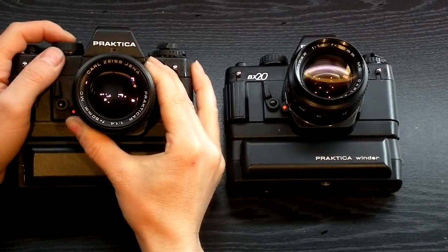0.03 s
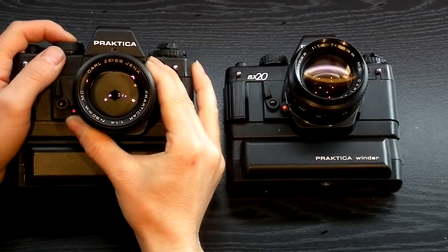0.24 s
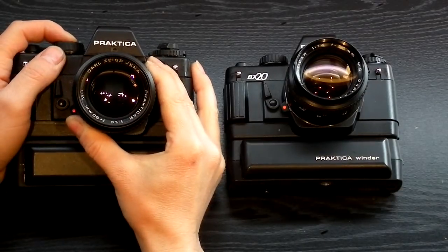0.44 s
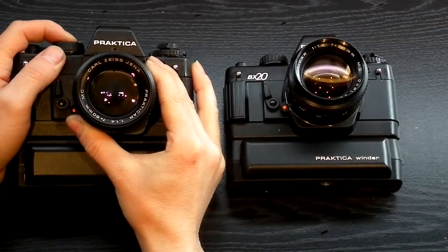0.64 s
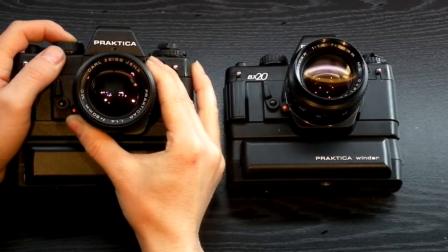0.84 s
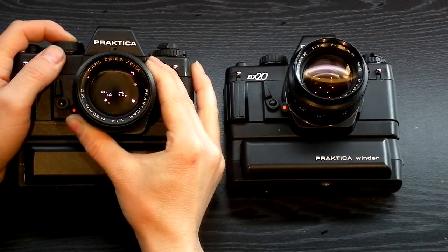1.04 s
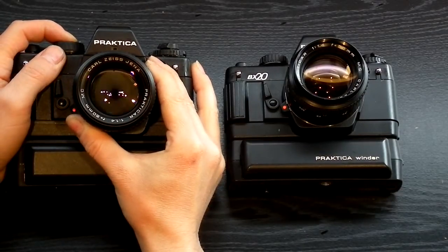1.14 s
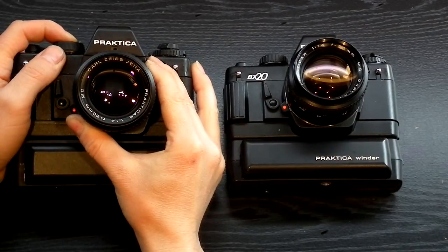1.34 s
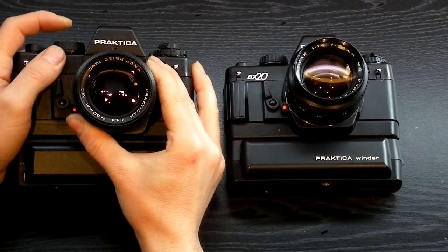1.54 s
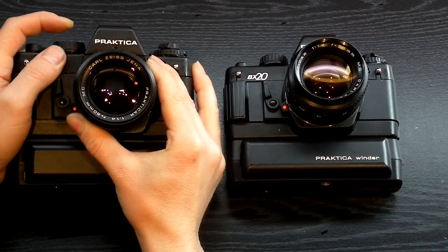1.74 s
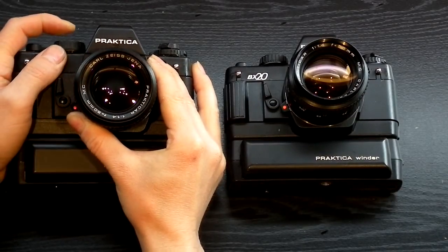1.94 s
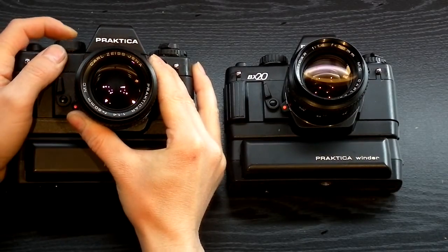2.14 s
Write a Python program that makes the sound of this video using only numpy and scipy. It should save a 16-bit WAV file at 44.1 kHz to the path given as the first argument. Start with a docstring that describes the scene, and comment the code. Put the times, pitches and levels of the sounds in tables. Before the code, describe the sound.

A film camera with a motor winder fires three quick shots close by in a small room. Each is a cluster of sharp shutter clacks followed by whining, rattling gears. The drive then coasts down with a small click.

```python
"""A film camera on a motor winder fires three frames on a wooden table in a small room.
Each frame opens with a run of clacks: the release snaps, the mirror knocks, the shutter slaps shut.
Then the motor spins up and its gears whine, rattle and squeal as they pull the film on, until a pawl
ticks near the end of the wind. After the last frame the drive coasts down, a latch springs back,
and a faint high whine pulses over the fading whirr."""
import sys
import numpy as np
from scipy import signal
from scipy.fft import rfft, irfft
from scipy.io import wavfile
from scipy.ndimage import uniform_filter1d

SR = 44100
rng = np.random.default_rng(int(sys.argv[2]) if len(sys.argv) > 2 else 0)


def int16_out(signal):
    """Quantize to a 16-bit WAV file."""
    q = np.round(np.clip(np.atleast_2d(signal).T, -1, 1) * 32767)
    wavfile.write(sys.argv[1], SR, q.astype(np.int16))


N = 97020
T = np.arange(N) / SR
FFT_SIZE = 2 ** 17
FREQS = np.arange(FFT_SIZE // 2 + 1) * SR / FFT_SIZE

# stereo width: (frequency [Hz], side minus mid [dB])
WIDTH = [(1200, -8), (6000, -2.5)]
# EQ of the background hiss and of the reverb: (frequency [Hz], gain [dB])
FLOOR_EQ = [(40, -13), (300, -0.5), (1700, -2), (15000, -25.5)]
ROOM_EQ = [(500, 5.5), (9000, 1)]
# treble notches on the whole mix: (frequency [Hz], half width [Hz], gain [dB])
NOTCHES = [(7900, 350, -22), (8833, 470, -25), (11690, 370, -17.5)]

# closing whine: (start [s], settled pitch [Hz], fall [Hz], pulse rate [1/s], level [dB])
HIGH_WHINE = [(1.69, 5140, 170, 13, -43)]
# fade of the coasting drive: (time [s], level [dB])
COAST_LEVEL = [(1.45, -36), (1.64, -31.5), (1.8, -33), (2.2, -39)]
# EQ of its whirr: (frequency [Hz], gain [dB])
COAST_EQ = [(150, -20), (700, -10.5), (1350, 2), (2800, -4.5), (8000, -23.5), (15000, -24)]

# gear tones, one list per wind: (time [s], mesh rate [Hz], low gear [dB], mesh [dB], octave [dB])
WINDS = [
    [(.455, 1795, -48, -21, -52), (.478, 1997, -34.5, -24.5, -33), (.524, 2256, -32.5, -27.5, -22),
     (.595, 2398, -42, -24.5, -35), (.64, 2419, -59, -20.5, -30), (.7, 2466, -50, -37, -39)],
    [(.87, 2451, -36, -44, -51), (.92, 2654, -26, -16.5, -23), (.96, 2684, -22.5, -29, -25),
     (1.0, 2660, -30.5, -17.5, -20), (1.035, 2635, -36, -26.5, -21.5), (1.08, 2601, -41, -30, -21)],
    [(1.265, 2581, -37, -26, -36), (1.31, 2741, -21, -23.5, -29), (1.34, 2730, -31, -13.5, -27.5),
     (1.392, 2712, -26, -31.5, -28), (1.415, 2669, -20, -24.5, -22), (1.447, 2660, -30, -23, -21.5),
     (1.468, 2625, -32, -26, -25)],
]
# their pan, left minus right: (low gear [dB], mesh [dB], octave [dB])
TONE_PANS = [1.5, -4.5, -3.5]
# pinion side tones, relative levels: (pitch [x shaft rate], first wind [dB], later winds [dB])
SIDE_TONES = [(12, -41, -37), (14.5, -31.5, -41)]
PINION_TEETH, LOW_GEAR_RATIO = 8, .463
WHINE_JITTER, BUZZ_JITTER = 0.0029, .004  # fractions of the motor's speed
# resonances of the winder's housing: (frequency [Hz], boost [dB], half width [Hz])
HOUSING_PEAKS = [(3980, 7.5, 20), (4322, 11, 88), (6700, 6, 72)]
# the gear train runs under load: (start [s], stop [s], rattle level [dB])
LOADS = [(0.357, 0.677, -20), (0.819, 1.091, -21), (1.219, 1.479, -22)]
# the rattle swells as the film starts to move, wind by wind: (delay from load start [s])
STRAIN_DELAYS = [0.11, 0.067, 0.061]
# EQ of the rattle: (frequency [Hz], gain [dB])
RATTLE_EQ = [(100, -37), (700, -16), (1300, 6), (1700, 1.5), (2950, 4.5), (4800, 4.5), (5950, 3), (7000, 4),
             (15000, -20)]
# the gears squeal as they take up the film: (time [s], half length [s], level [dB])
SQUEALS = [(.492, 0.04, -26), (.895, .02, -33), (1.3, .02, -21.5)]

# the camera's contacts: (time [s], level [dB], decay [s])
RELEASE_SNAPS = [(.227, -4, 0.0015), (.699, -7.5, 0.0037), (1.088, -9, 0.0057), (1.474, -12.5, 0.011)]  # the release snaps open
MIRROR_KNOCKS = [(.3175, -11.5, 0.0048), (.6955, -16, 0.011), (.7895, -15, 0.0045), (1.1, -20.5, 0.011),
                 (1.1825, -16, 0.0035)]  # the mirror hits its stops
SHUTTER_SLAPS = [(.3308, -6, 0.0016), (.8035, -6.5, 0.0015), (1.196, -5.5, 0.0013)]
LEVER_TAPS = [(0.2549, -9, 0.0028), (0.3582, -14.5, 0.0072), (0.728, -13, 0.0022), (0.83, -13, 0.0074),
              (1.12, -14, 0.0024), (1.221, -13, 0.0061)]
PAWL_TICKS = [(.6535, -12, 0.0046), (1.0485, -11, 0.0025), (1.4322, -9.5, 0.0018)]
LATCH_CLICK = [(1.6245, -17.5, 0.005)]  # the release button's latch springs back
# EQ of each kind of contact: (frequency [Hz], gain [dB])
SNAP_EQ = [(100, -36.5), (700, -9), (1600, -3), (2650, 6.5), (4000, -4), (7000, 0), (15000, -12)]
KNOCK_EQ = [(100, -37), (800, -9), (1500, 0), (2300, 3.5), (6000, -3.5), (15000, -28)]
SHUTTER_EQ = [(60, -24.5), (450, -12), (2200, 7), (3600, 2.5), (6000, 4.5), (9000, 3), (15000, -10)]
# ring of the struck parts: (frequency [Hz], level against the hit [dB], T60 [s])
MIRROR_MODES = [(1450, 0, 0.018)]
LATCH_MODES = [(1406, -8, 0.072), (4560, -3, 0.064)]


def from_db(db):
    """Decibels to gain."""
    return 10 ** (np.asarray(db) / 20)


def rms_one(x):
    """Scale to unit power."""
    return x / np.sqrt(np.mean(x ** 2) + 1e-20)


def automation(rows):
    """Straight ramps between timed breakpoints, one lane per column."""
    times, *columns = np.transpose(rows)
    return [np.interp(T, times, column) for column in columns]


def eq_curve(points):
    """EQ breakpoints as gain at every frequency."""
    hz, db = np.transpose(points)
    return from_db(np.interp(np.log(FREQS + 1), np.log(hz), db))


def apply_eq(x, gain):
    """Minimum-phase EQ, so nothing rings ahead of a hit."""
    cepstrum = irfft(np.log(gain + 1e-9))
    cepstrum[1:FFT_SIZE // 2] *= 2
    cepstrum[FFT_SIZE // 2 + 1:] = 0
    return irfft(rfft(x, FFT_SIZE) * np.exp(rfft(cepstrum)), FFT_SIZE)[..., :N]


def high_pass(x, edge_hz):
    """A gentle first-order low cut."""
    return signal.sosfilt(signal.butter(1, edge_hz, "high", fs=SR, output="sos"), x)


def drift(rate_hz):
    """Smooth random modulation at unit power."""
    pole = np.exp(-2 * np.pi * rate_hz / SR)
    return rms_one(signal.lfilter([1], [1, -2 * pole, pole * pole], rng.standard_normal(N + SR))[SR:])


def stereo_noise():
    """White noise, narrow in the bass and wider in the treble."""
    mid, side = rng.standard_normal((2, N))
    width = eq_curve(WIDTH)
    total = np.sqrt(1 + width ** 2)
    return apply_eq(mid, 1 / total) + apply_eq(side, width / total) * [[1], [-1]]


def noise_floor(db=-46.5):
    """A steady bed of dull hiss."""
    return from_db(db) * rms_one(apply_eq(stereo_noise(), eq_curve(FLOOR_EQ)))


def room(send, t60_s=0.3, predelay_s=0.006):
    """The small room answers with a short diffuse tail."""
    tail = stereo_noise() * from_db(-60 * T / t60_s) * (T > predelay_s)
    tail = apply_eq(rms_one(tail) / np.sqrt(N), eq_curve(ROOM_EQ))
    return signal.fftconvolve(send.mean(axis=0)[None], tail, axes=1)[:, :N]


def ring(start, hz, db, t60_s):
    """One struck mode: a dying sine."""
    age = np.maximum(T - start, 0)
    return from_db(db - 60 * age / t60_s) * np.sin(2 * np.pi * hz * age)


def table_boom(lag_s=0.033, below_tap_db=32.5):
    """The table top booms faintly under each lever tap."""
    return sum(ring(time + lag_s, hz=106, db=db - below_tap_db, t60_s=0.15) for time, db, _ in LEVER_TAPS)


def high_whine(unevenness=.22, fade_db_per_s=6):
    """A faint high whine in uneven pulses, each sliding down and swelling as it settles."""
    out = 0
    for start, hz, fall_hz, pulse_rate, db in HIGH_WHINE:
        cycle = np.cumsum((T > start) * pulse_rate * (1 + unevenness * drift(4.2))) / SR % 1
        phase = 2 * np.pi * np.cumsum(hz + fall_hz * (1 - cycle) ** 2) / SR
        swell = np.sin(np.pi * cycle ** 2)
        out += from_db(db - fade_db_per_s * (T - start)) * swell * np.sin(phase)
    return out


def coast():
    """The freed drive runs down with a soft grainy whirr."""
    grains = rms_one(stereo_noise() * from_db(1.2 * drift(250)))
    fade = from_db(automation(COAST_LEVEL)[0]) * (T > COAST_LEVEL[0][0])
    return apply_eq(grains * fade, rms_one(eq_curve(COAST_EQ)))


def housing():
    """Narrow resonances of the winder's shell, as gain at every frequency."""
    return from_db(sum(db / (1 + ((FREQS - hz) / width) ** 2) for hz, db, width in HOUSING_PEAKS))


def running_hz():
    """The rate at which teeth meet at running speed, across all three winds."""
    return automation([row for rows in WINDS for row in rows])[0]


def mesh_phase(jitter, spin_up_power=.6):
    """Angle of the gear mesh; in each wind the motor climbs from rest to its running speed."""
    hz = running_hz()
    for (start, _, _), rows in zip(LOADS, WINDS):
        climb = np.clip((T - start) / (rows[0][0] - start), 0, 1) ** spin_up_power
        hz = hz * np.where(T > start, climb, 1)
    return 2 * np.pi * np.cumsum(hz * (1 + jitter * drift(104.5))) / SR


def gear_tone(phase, db, pan_db, flutter_db=0.8):
    """One fluttering gear tone; positive pan leans left."""
    gain = from_db(db + flutter_db * drift(34) + np.array([[pan_db / 2], [-pan_db / 2]]))
    return np.sqrt(2) * gain * np.sin(phase)


def gear_squeal(upper_db=-9.5, flutter_db=3.5):
    """Under strain the low gear modulates the mesh and its octave, giving two rough sum tones."""
    phase = mesh_phase(BUZZ_JITTER)
    strain = sum(from_db(db) * np.exp(-((T - time) / width) ** 2) for time, width, db in SQUEALS)
    tones = sum(gear_tone((harmonic + LOW_GEAR_RATIO) * phase, db + flutter_db * drift(90), pan_db=0.5)
                for harmonic, db in ((1, 0), (2, upper_db)))
    return strain * tones


def gear_whine(fade_s=0.0079, side_trim_db=-3.5, side_onset_hz=2090):
    """Tones locked to the motor's speed; side tones sing out as they cross the housing's resonances."""
    tones, sides = 0, 0
    phase = mesh_phase(WHINE_JITTER)
    for wind, rows in enumerate(WINDS):
        hz, *levels = automation(rows)
        start, end = rows[0][0], rows[-1][0]
        gate = np.clip((T - start) / fade_s, 0, 1) * np.clip(1 + (end - T) / fade_s, 0, 1)
        for ratio, db, pan_db in zip((LOW_GEAR_RATIO, 1, 2), levels, TONE_PANS):
            tones += gate * gear_tone(ratio * phase, db, pan_db)
        # the side tones open up as the mesh rate passes their onset
        effort_db = side_trim_db - 20 * np.log10(1 + (side_onset_hz / hz) ** 20)
        for multiple, first_db, later_db in SIDE_TONES:
            db = (first_db if wind == 0 else later_db) + effort_db
            sides += gate * gear_tone(multiple / PINION_TEETH * phase, db, pan_db=11.5)
    return tones + apply_eq(sides, housing())


def tooth_buzz(shaft, flutter_db=2.5):
    """Uneven teeth repeat with every turn of the shaft: wavering overtones between the mesh tones."""
    return rms_one(sum(from_db(flutter_db * drift(31)) * np.sin(k * shaft + rng.uniform(0, 2 * np.pi))
                       for k in range(PINION_TEETH // 2, 32) if k % PINION_TEETH))


def rattle_envelope(attack_s=0.027, release_s=0.047, strain_db=5, strain_width_s=0.039):
    """The rattle rises with the load, swells as the film starts to move and dies as the load lets go."""
    envelope = 0
    for (start, stop, db), delay in zip(LOADS, STRAIN_DELAYS):
        swell_db = strain_db * np.exp(-((T - start - delay) / strain_width_s) ** 2)
        attack = 1 - np.exp(-np.maximum(T - start, 0) / attack_s)
        release = np.exp(-np.maximum(T - stop, 0) / release_s)
        envelope += from_db(db + swell_db) * attack * release
    return envelope


def gear_rattle(pulse_depth=0.14, buzz_db=1, bright_db_per_octave=9, treble_pan_db=6.5):
    """Tooth impacts, part buzz and part loose clatter, through the housing; brighter with speed."""
    hz = running_hz()
    shaft = mesh_phase(BUZZ_JITTER) / PINION_TEETH
    body = eq_curve(RATTLE_EQ) * housing()
    clatter = rms_one(apply_eq(stereo_noise() * (1 + pulse_depth * np.cos(shaft)), body))
    buzz = rms_one(apply_eq(tooth_buzz(shaft), body))
    teeth = rms_one(clatter + from_db(buzz_db) * buzz)
    shelf_db = bright_db_per_octave * np.log2(hz / np.median(hz))
    shelf = from_db(shelf_db + treble_pan_db * np.array([[.5], [-.5]]))
    teeth += high_pass(teeth, edge_hz=4500) * (shelf - 1)
    return teeth * rattle_envelope()


def clacks(contacts, eq, rise_s, modes=(), shiver_db=-16.5, shiver_s=0.013):
    """Each contact is a brief crush of tiny impacts; the body shivers on and any given modes ring."""
    noise = stereo_noise()
    noise /= np.sqrt(uniform_filter1d(np.mean(noise ** 2, axis=0), size=24))  # keeps the punch even
    force = sum(from_db(db + share_db) * np.exp(-np.maximum((time - T) / rise_s, (T - time) / fall_s))
                for time, db, decay_s in contacts
                for share_db, fall_s in ((0, decay_s), (shiver_db, shiver_s)))
    rings = sum(ring(time - rise_s / 2, hz, db + mode_db, t60_s)
                for time, db, _ in contacts for hz, mode_db, t60_s in modes)
    return apply_eq(noise * force, rms_one(eq_curve(eq))) + rings


def camera_action():
    """The camera's parts hit their stops; the light ones are low-cut, leaving the thump to the shutter."""
    light = (clacks(RELEASE_SNAPS, SNAP_EQ, rise_s=0.0009)
             + clacks(MIRROR_KNOCKS, KNOCK_EQ, rise_s=0.0014, modes=MIRROR_MODES)
             + clacks(LEVER_TAPS, SNAP_EQ, rise_s=0.0028)
             + clacks(PAWL_TICKS, SNAP_EQ, rise_s=0.00098)
             + clacks(LATCH_CLICK, KNOCK_EQ, rise_s=0.00249, modes=LATCH_MODES))
    return clacks(SHUTTER_SLAPS, SHUTTER_EQ, rise_s=0.0039) + high_pass(light, edge_hz=160)


def scene():
    """Clacks, gears and run-down over the hiss, with the clacks sent hardest to the room."""
    hits = camera_action()
    rattle = gear_rattle()
    tones = gear_whine() + gear_squeal()
    reverb = room(from_db(-6.5) * hits + from_db(-13.5) * rattle + from_db(-12) * tones)
    return noise_floor() + reverb + table_boom() + coast() + high_whine() + tones + rattle + hits


def record(dry, cutoff_hz=16000):
    """Sound reaches the right mic half a sample late; then treble notches, a peak clip and a high cut."""
    lag = np.exp(-1j * np.pi * FREQS / SR * np.array([[0], [1]]))
    spaced = irfft(rfft(dry, FFT_SIZE) * lag, FFT_SIZE)[:, :N]
    notches_db = sum(db * np.exp(-((FREQS - hz) / width) ** 2) for hz, width, db in NOTCHES)
    clipped = np.clip(apply_eq(spaced, from_db(notches_db)), -1, 1)
    return signal.sosfilt(signal.cheby2(16, 80, cutoff_hz, fs=SR, output="sos"), clipped)


dry = scene()
out = record(dry)
int16_out(out)
```